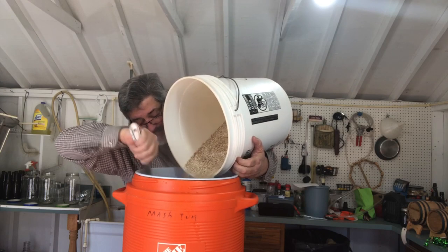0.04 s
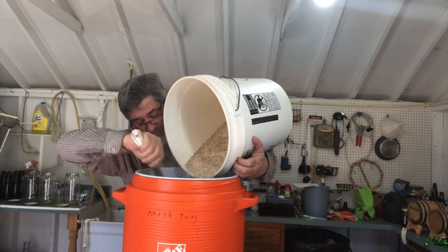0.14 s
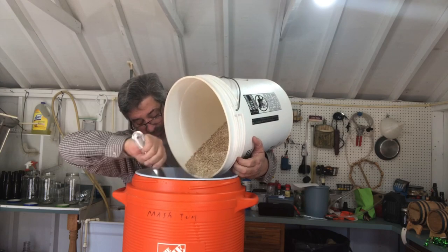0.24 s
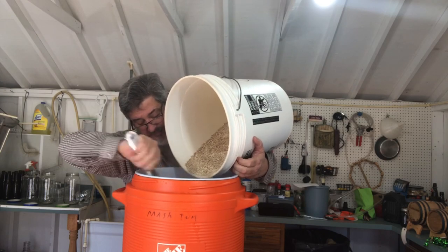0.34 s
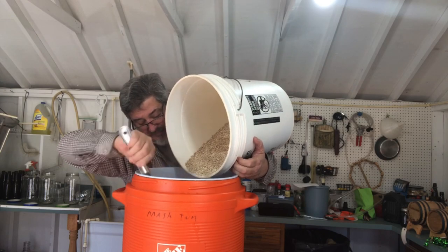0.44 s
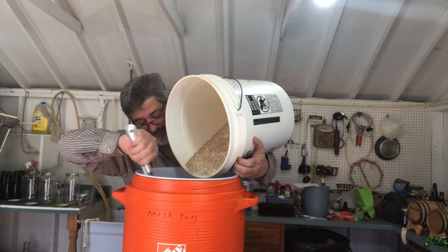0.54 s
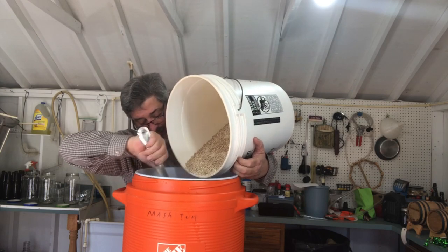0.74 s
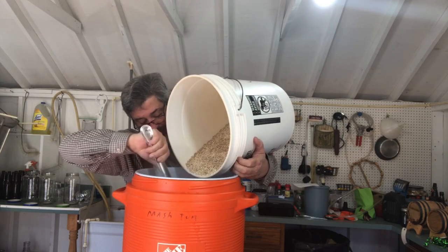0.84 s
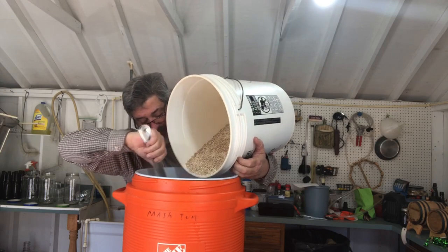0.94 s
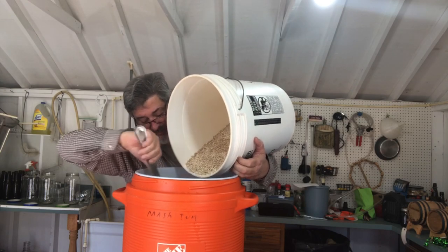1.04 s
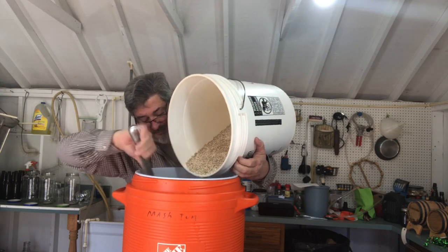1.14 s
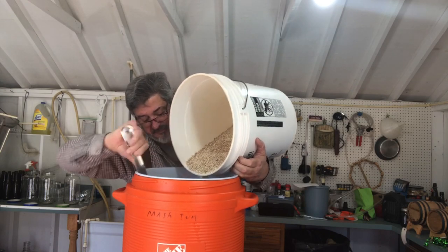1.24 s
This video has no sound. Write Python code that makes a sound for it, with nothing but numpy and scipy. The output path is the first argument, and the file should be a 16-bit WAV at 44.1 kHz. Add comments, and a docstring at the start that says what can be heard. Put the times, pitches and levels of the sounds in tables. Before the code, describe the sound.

Barley patters softly into a thick plastic tub, with hollow knocks and small ticks from stirring

```python
"""Grain poured into a tub

Close in a shed, dry grain trickles from a plastic bucket into a thick plastic tub of water: a patchy
hiss and dense short pats, with single kernels as fuzzy ringing ticks and plops or as treble snaps.
A stirring paddle knocks the wall and rings its modes, with sparse taps for the shed's reverberation.
Behind lie the tub's hum, slosh and room air, a slow rumble and a faint wavering tone. Nearly mono."""
import sys
import numpy as np
from scipy import signal
from scipy.fft import rfft, irfft
from scipy.io import wavfile
from scipy.ndimage import uniform_filter1d

SR = 44100
rng = np.random.default_rng(int(sys.argv[2]) if len(sys.argv) > 2 else 0)


def transcribe(u):
    """Save the signal u as a 16-bit wav file named by the first command-line argument.

    u: samples, shape (n,) or (channels, n), limited to [-1, 1]; the rate is SR.
    q: integer samples, one column per channel.
    """
    v = np.clip(np.atleast_2d(u).T, -1, 1)
    q = np.round(v * 32767).astype(np.int16)
    wavfile.write(sys.argv[1], SR, q)


def convert_level_to_amplitude(level_db):
    """Map a level in decibels to its linear amplitude factor."""
    exponent = np.asarray(level_db, float) / 20
    return 10 ** exponent


N = 57330  # 1.3 s

# level of the falling grain: start_s, level_db
POUR_LEVEL = [(0, -72), (.12, -75), (.2, -73), (.28, -77), (.34, -72), (.45, -72), (.52, -68.5),
              (.57, -70.5), (.61, -77.5), (.68, -76), (.78, -74.5), (.86, -73), (.92, -70.5), (1.0, -76.5),
              (1.1, -74), (1.15, -77.5), (1.21, -71.5), (1.3, -80)]
# relative spectrum of the falling grain: pitch_hz, level_db (per Hz)
GRAIN_SPECTRUM = [(1200, -41), (2000, -11.5), (2700, -10.5), (3700, -8.5), (5000, -5.5), (6500, -9.5),
                  (8500, -9), (10500, -12), (11800, -12.5), (13000, -12), (15500, -20.5)]
# gain of the grain's top treble: start_s, level_db
SHEEN_LEVEL = [(0, 5), (.12, 5), (.25, 1.5), (.4, 5.5), (.5, -4), (.6, -2), (.9, -2.5), (1.3, -4)]
# single kernels ticking or plopping: start_s, level_db, pitch_hz (centre), t60_s
TICKS = [(.019, -61.5, 1670, 0.028), (.019, -59, 4800, 0.023), (.133, -60.5, 1840, 0.069),
         (0.132, -69, 1315, 0.051), (0.135, -63, 2560, 0.016), (.187, -57.5, 4140, .02),
         (0.209, -70, 4600, 0.018), (0.272, -53, 1570, 0.06), (.346, -59.5, 2300, 0.027),
         (.3535, -45.5, 590, 0.023), (.3535, -54, 440, 0.033), (.354, -53, 5210, 0.012),
         (0.382, -50, 1710, 0.013), (0.715, -55, 1700, 0.0096), (0.808, -64.5, 2900, 0.014),
         (0.8878, -49.5, 1920, .05), (0.89, -51.5, 2470, 0.035), (.890, -46.5, 960, 0.027),
         (1.01, -58.5, 3690, .025), (1.054, -65, 1800, 0.031), (1.097, -46, 2220, 0.0083),
         (1.105, -58, 3850, 0.015)]
# dry kernels snapping: start_s, level_db (rms before decay), lowest_hz
SNAPS = [(0.033, -65.5, 5700), (.094, -61.5, 6000), (.110, -61, 5030), (.148, -67.5, 5630),
         (0.292, -82, 3500), (.325, -75, 8000), (0.35, -64, 7000), (.392, -60, 8900), (.511, -56.5, 3000),
         (0.569, -71, 6000), (0.643, -60.5, 5600), (0.898, -59.5, 4000), (0.907, -82, 4970),
         (1.077, -56.5, 4450), (1.01, -59.5, 4960), (1.106, -63.5, 7000)]
# paddle on the wall: start_s, strength_db, contact_ms, deep_modes_db, high_modes_db, crack_db,
# free_share (of the ring time left to the modes below the high ones)
KNOCKS = [(.2400, -41, 0.48, -7, 16.5, -26, 0.27), (0.2411, -25, 1.09, 1.5, -18, -31.5, 0.65),
          (0.291, -46, 0.38, -4, 5.5, -1, 0.92), (0.4821, -34, 0.37, 2, 11.5, -3, 0.7),
          (.490, -46.5, 0.44, 4.5, 9, -2, 0.94), (0.5475, -55.5, 0.27, -28, 14, -7, 0.31),
          (0.695, -55, 0.55, -8, -19, -31, 0.2), (.8912, -50.5, 0.34, -3.5, -10, -18, 0.64),
          (1.0664, -35, 1.29, -1, -17, -40, 0.45), (1.068, -46, 0.34, -20.5, 12.5, -3.5, 0.48),
          (1.0703, -44.5, 0.087, 7, 7.5, 2, 0.4)]
# modes of the tub wall: pitch_hz, level_db (relative), t60_s (ringing freely)
TUB_MODES = [(62.8, -16.5, 0.86), (98, -11.5, 0.28), (130.6, -1.5, 0.16), (152, -8, 0.36), (187.8, 3, 0.13),
             (245, 2, 0.19), (282, -7.5, 0.16), (423.8, -4, 0.13), (448.2, -12.5, 0.18), (522, -18, 0.24),
             (590, -26, 0.3), (692.4, -14, 0.21), (960, -14.5, 0.031), (1111, -7.5, 0.013),
             (1410, -6.5, 0.017), (1700, -6, 0.013), (1876, -23.5, 0.017), (2300, -23, 0.056),
             (3000, -24.5, 0.037), (3440, -16, .03)]
# relative spectrum of the crack of a knock: pitch_hz, level_db
CRACK_SPECTRUM = [(300, -3), (1200, 3), (2300, -7), (3300, 1), (5000, -9), (7000, -11.5), (9000, -10.5),
                  (11000, -22), (13000, -28)]
# reverberation of the shed: pitch_hz, t60_s
SHED_DECAY = [(100, 0.067), (500, .3), (2000, 0.12), (8000, 0.14)]
# level of the tub's hum: start_s, level_db
HUM_LEVEL = [(0, -66.5), (.13, -71), (.22, -69.5), (.45, -63), (.65, -79.5), (.8, -65.5), (1, -68),
             (1.3, -72.5)]
# relative spectrum of slosh and room air: pitch_hz, level_db (per Hz)
ROOM_SPECTRUM = [(24, -50), (40, 5.5), (60, -7.5), (139, -7), (207, -40), (239, -4), (314, -9.5),
                 (467, -5.5), (520, -9.5), (682, -10), (720, -17), (1780, -22.5), (3000, -31.5),
                 (3900, -26.5), (6600, -120)]
# slosh over its base level: start_s, level_db
STIR_LEVEL = [(0, -14), (.2, -14), (.4, -11), (.6, -7), (.8, -10.5), (.95, -10.5), (1.15, -16), (1.3, -6)]
# level of the lowest rumble: start_s, level_db
RUMBLE_LEVEL = [(0.0, -53), (0.024, -61.5), (0.466, -64), (0.51, -36), (0.596, -49.5), (0.672, -59),
                (0.824, -56), (0.858, -63), (0.926, -65), (0.952, -69), (1.146, -68), (1.3, -64.5)]
# level of the faint tone: start_s, level_db
TONE_LEVEL = [(0, -120), (.54, -120), (.565, -82), (.59, -69), (.612, -88), (.652, -69), (.678, -90),
              (.71, -74), (.735, -90), (.76, -120)]
# treble roll-off of the whole mix: pitch_hz, level_db
TREBLE_ROLLOFF = [(10, 0), (11000, 0), (12500, -5), (14000, -12), (16000, -17)]


def evened(x):
    """Scales to rms 1."""
    return x / np.sqrt(np.mean(x ** 2) + 1e-20)


def read(points, hz):
    """Reads a spectrum on a log-frequency axis."""
    point_hz, value = np.transpose(points)
    return np.interp(np.log(hz + 1), np.log(point_hz + 1), value)


def curve(points):
    """Turns a dB curve over time into gain."""
    s, db = np.transpose(points)
    return convert_level_to_amplitude(np.interp(np.arange(N) / SR, s, db))


def add(mix, start_s, sound):
    """Mixes a sound in at its start time, cut at the end of the mix."""
    part = mix[round(start_s * SR):][:len(sound)]
    part += sound[:len(part)]


def coloured(x, points):
    """Filters by a spectrum in dB."""
    hz = np.fft.rfftfreq(len(x), 1 / SR)
    return irfft(rfft(x) * convert_level_to_amplitude(read(points, hz)), len(x))


def resonate(x, hz, width_hz):
    """Passes sound through one fixed resonance."""
    r = np.exp(-np.pi * width_hz / SR)
    return signal.lfilter([1 - r], [1, -r * np.exp(2j * np.pi * hz / SR)], x).real


def patchy(points, patchy_db):
    """Noise of a given spectrum whose level drifts in patches over time and frequency."""
    real, imag, patches = rng.standard_normal((N // 128 + 5, 257, 3)).T
    patches = uniform_filter1d(patches, size=8, axis=0)  # over frequency
    patches = evened(uniform_filter1d(patches, size=12, axis=1))  # over time
    cells = (real + 1j * imag) * convert_level_to_amplitude(patchy_db * patches)
    noise = signal.istft(cells, nperseg=512, noverlap=384)[1][:N]
    return evened(coloured(noise, points))


def patter():
    """Random kernels each excite one of 24 short decaying rings."""
    grains_per_s, spread_db = 2100, -1.5
    struck = rng.random(N) < grains_per_s / SR
    size = convert_level_to_amplitude(spread_db * np.minimum(rng.exponential(1, N), 4)) * struck
    kind = rng.integers(0, 24, N)
    t = np.arange(200) / SR
    pats = np.zeros(N)
    for k, hz in enumerate(np.geomspace(1500, 13000, num=24)):
        ring = np.sin(2 * np.pi * hz * t) * np.exp(-t * hz / 2.9) * np.sqrt(hz)
        pats += signal.oaconvolve(size * (kind == k), ring)[:N] * np.sqrt(hz)
    return evened(coloured(pats, GRAIN_SPECTRUM))


def pour():
    """Massed kernels blur into a hiss, over separate pats; the top treble has its own level."""
    patter_db, sheen_hz = -1, 7000
    hiss = patchy(GRAIN_SPECTRUM, patchy_db=2.0)
    grain = curve(POUR_LEVEL) * (hiss + convert_level_to_amplitude(patter_db) * patter())
    body = signal.filtfilt(*signal.butter(2, sheen_hz, fs=SR), grain)
    return body + curve(SHEEN_LEVEL) * (grain - body)


def tick(level_db, hz, t60_s):
    """A kernel's ring: three slightly detuned sines make it fuzzy, with a soft start."""
    rise_s = .0012
    t = np.arange(3000) / SR
    detune = 1 + .025 * rng.standard_normal((3, 1))
    ring = np.sin(2 * np.pi * hz * detune * t).sum(0) / 2
    return convert_level_to_amplitude(level_db - 60 * t / t60_s) * np.minimum(t / rise_s, 1) * ring


def snap(level_db, lowest_hz):
    """A dry kernel's snap: a broad, bright burst of treble noise that dies at once."""
    t60_s = 0.015
    t = np.arange(1500) / SR
    spectrum = [(lowest_hz / 2, -30), (lowest_hz, 0), (10500, -2), (14000, -22)]
    burst = evened(coloured(rng.standard_normal(len(t)), spectrum))
    return burst * convert_level_to_amplitude(level_db - 60 * t / t60_s)


def knock(strength_db, contact_ms, deep_db, high_db, crack_db, free_share):
    """A half-sine push rings the wall's modes; a short crack rides on top."""
    deep_hz, high_hz, place_db = 210, 800, 3.5
    bloom_cycles, wall_cut_hz = .45, 95
    crack_t60_s, crack_rise_s = .014, .0004
    t = np.arange(SR // 2) / SR
    hz, db, t60_s = np.transpose(TUB_MODES)[:, :, None]
    db = db + deep_db * (hz < deep_hz) + high_db * (hz > high_hz)
    db = db + place_db * rng.standard_normal(hz.shape)  # each blow lands elsewhere
    t60_s = t60_s * np.where(hz < high_hz, free_share, 1)
    # modes swell over part of a cycle
    bloom = np.sin(np.pi / 2 * np.minimum(t * hz / bloom_cycles, 1)) ** 2
    modes = bloom * convert_level_to_amplitude(db - 60 * t / t60_s) * np.sin(2 * np.pi * hz * t)
    ring = -modes.sum(0)
    # the wall radiates no deep bass
    ring = signal.lfilter(*signal.butter(3, wall_cut_hz, "high", fs=SR), ring)
    push = np.sin(np.pi * np.clip(t[:300] * 1000 / max(contact_ms, .05), 0, 1))
    pushed = np.convolve(ring, push / push.sum())[:len(t)]
    crack = evened(coloured(rng.standard_normal(len(t)), CRACK_SPECTRUM))
    crack = crack * convert_level_to_amplitude(crack_db - 60 * t / crack_t60_s) * np.minimum(t / crack_rise_s, 1)
    return convert_level_to_amplitude(strength_db) * (pushed + crack)


def shed(x):
    """Reverberation: sparse taps of random sign, each band dying at its own speed."""
    level_db, cut_hz = -11, 350
    taps = np.zeros(SR // 2)
    at = np.arange(200, len(taps) - 20, 20)
    taps[at + rng.integers(0, 20, len(at))] = rng.choice([-1., 1.], len(at))
    hz, t, cells = signal.stft(taps, SR, nperseg=512)
    decay = convert_level_to_amplitude(-60 * t / read(SHED_DECAY, hz)[:, None])
    tail = signal.istft(cells * decay, SR, nperseg=512)[1]
    x = signal.lfilter(*signal.butter(1, cut_hz, "high", fs=SR), x)
    return convert_level_to_amplitude(level_db) * signal.fftconvolve(x, tail / np.linalg.norm(tail))[:N]


def hum():
    """Stirred water keeps the tub humming: noise feeds each of its modes."""
    total = np.zeros(N)
    for hz, db, t60_s in TUB_MODES:
        mode = resonate(rng.standard_normal(N), hz, width_hz=3.6 / t60_s)
        total += convert_level_to_amplitude(db) * evened(mode)
    return curve(HUM_LEVEL) * evened(total)


def slosh():
    """Stirred water and room air as one patchy noise."""
    base_db = -56
    return convert_level_to_amplitude(base_db) * curve(STIR_LEVEL) * patchy(ROOM_SPECTRUM, patchy_db=4.0)


def rumble():
    """Very low, slow sway of the air: noise through the same resonance twice."""
    hz, width_hz = 15, 12.7  # width of each pass
    once = resonate(rng.standard_normal(N), hz, width_hz)
    return curve(RUMBLE_LEVEL) * evened(resonate(once, hz, width_hz))


def tone():
    """A narrow tone whose pitch wavers at random as it throbs in and out."""
    centre_hz, waver_hz = 1365, 20  # waver is rms
    waver = evened(uniform_filter1d(rng.standard_normal(N), size=600))
    phase = 2 * np.pi * np.cumsum(centre_hz + waver_hz * waver) / SR
    return curve(TONE_LEVEL) * np.sqrt(2) * np.sin(phase)


def scene():
    """Knocks, ticks and snaps in the shed over the steady layers, the lows leaning slightly left."""
    side_db, side_hz = -36, 1100
    hits = np.zeros(N)
    for make, rows in ((knock, KNOCKS), (tick, TICKS), (snap, SNAPS)):
        for start_s, *settings in rows:
            add(hits, start_s, make(*settings))
    mid = hits + shed(hits) + pour() + slosh() + hum() + rumble() + tone()
    side = convert_level_to_amplitude(side_db) * signal.lfilter(*signal.butter(2, side_hz, fs=SR), mid)
    return np.array([mid + side, mid - side])


def top_cut(x):
    """Nothing passes above the cut-off."""
    return signal.sosfilt(signal.butter(12, 15530, fs=SR, output="sos"), x)


def record(dry):
    """Rolls off the top treble of both channels to finish the mix."""
    mix = np.array([coloured(x, TREBLE_ROLLOFF) for x in dry])
    return top_cut(mix)


dry = scene()
out = record(dry)
transcribe(out)
```